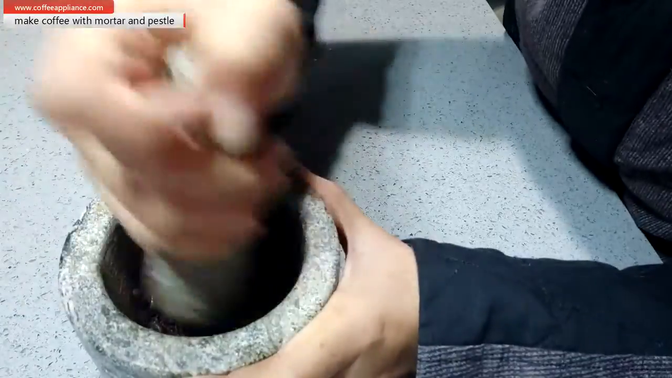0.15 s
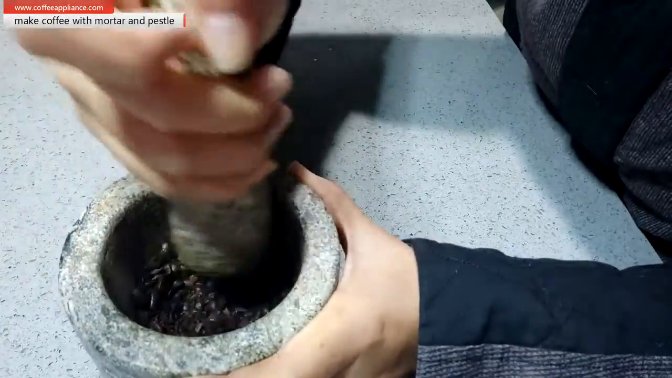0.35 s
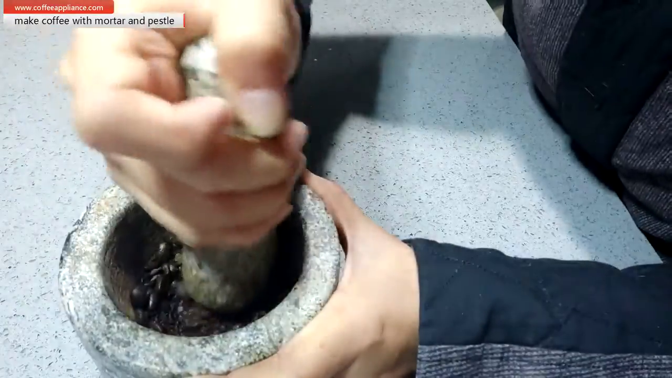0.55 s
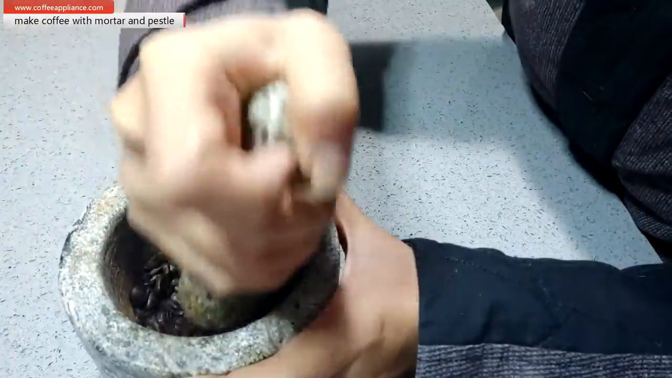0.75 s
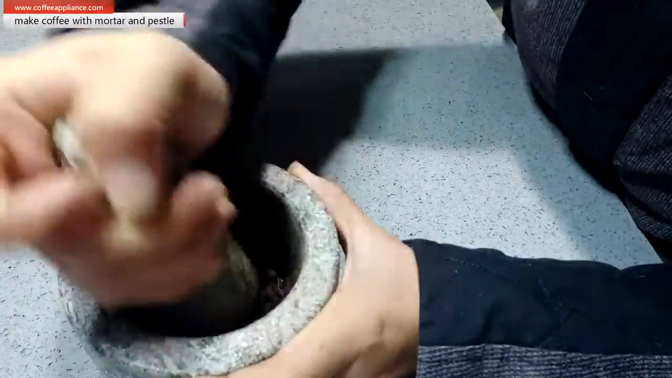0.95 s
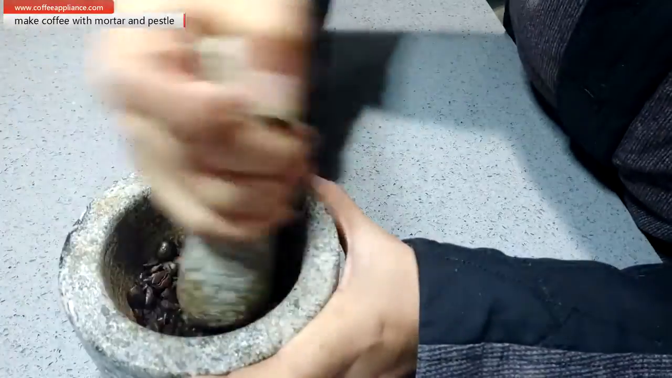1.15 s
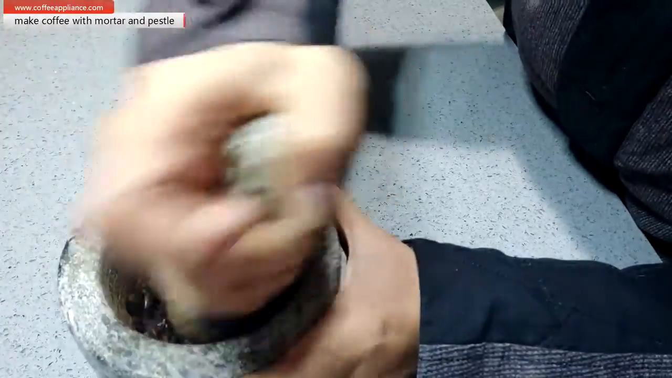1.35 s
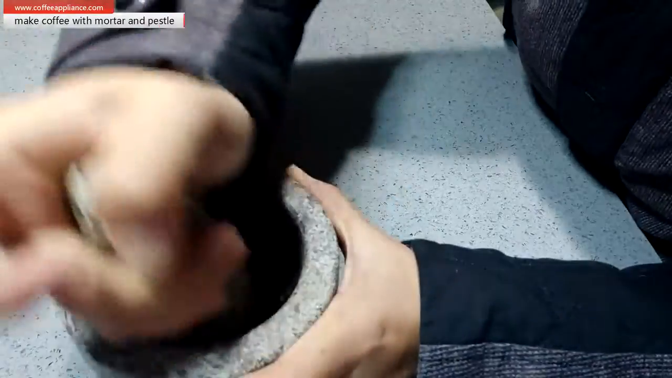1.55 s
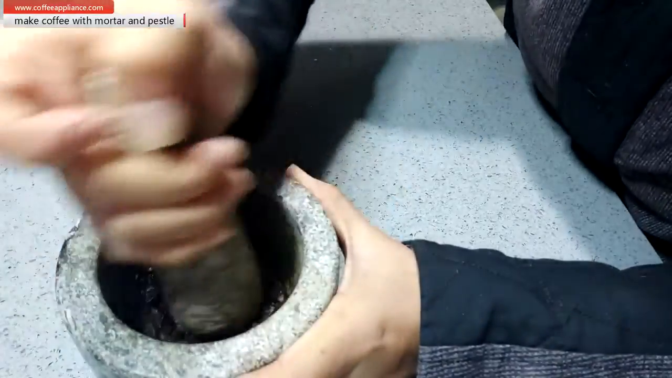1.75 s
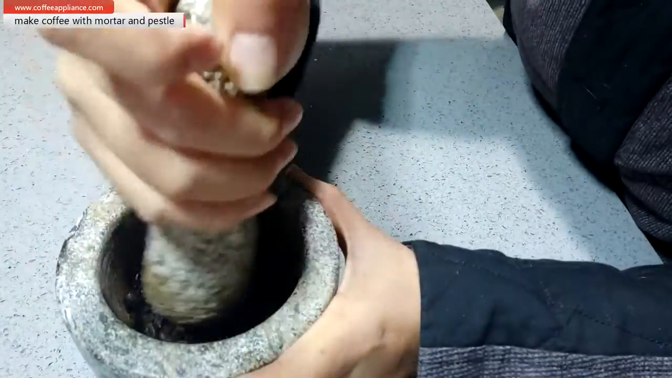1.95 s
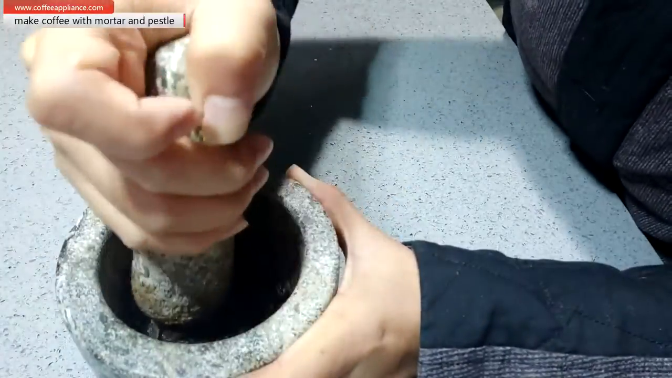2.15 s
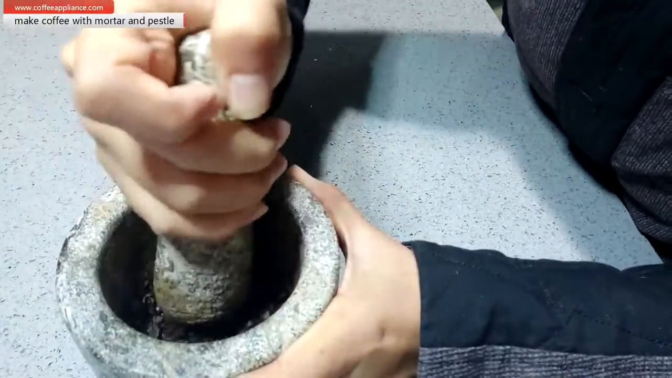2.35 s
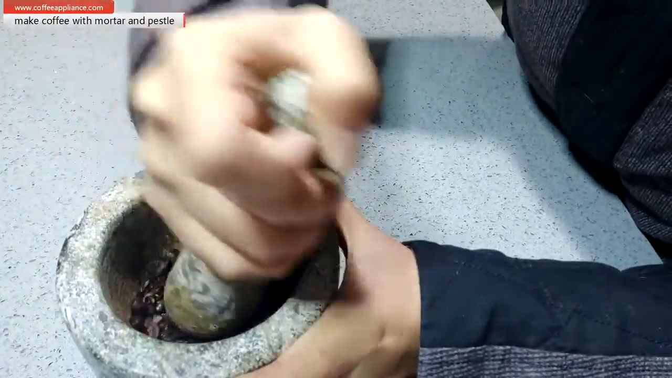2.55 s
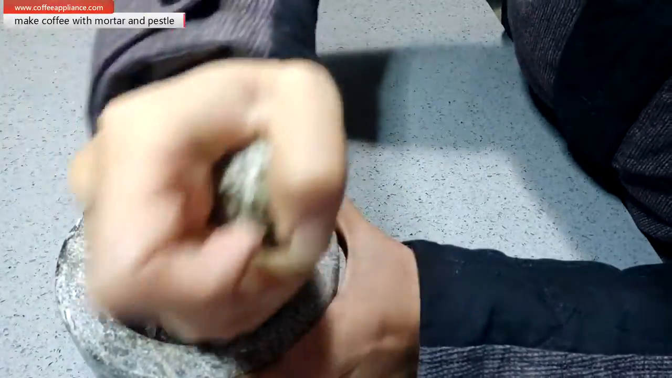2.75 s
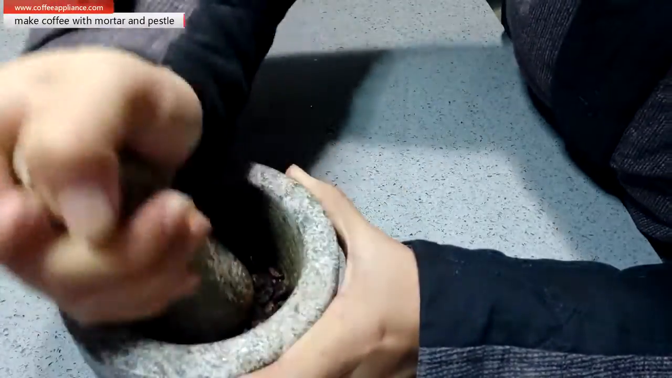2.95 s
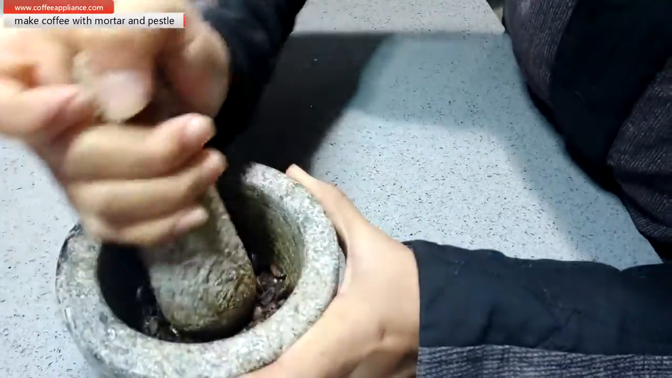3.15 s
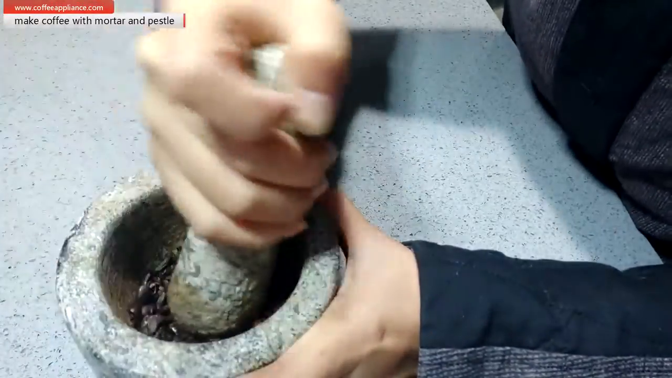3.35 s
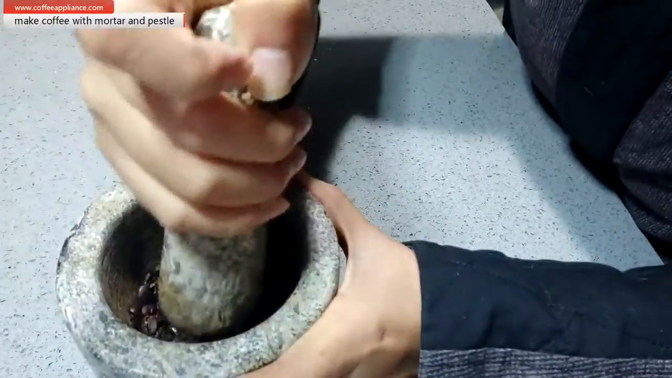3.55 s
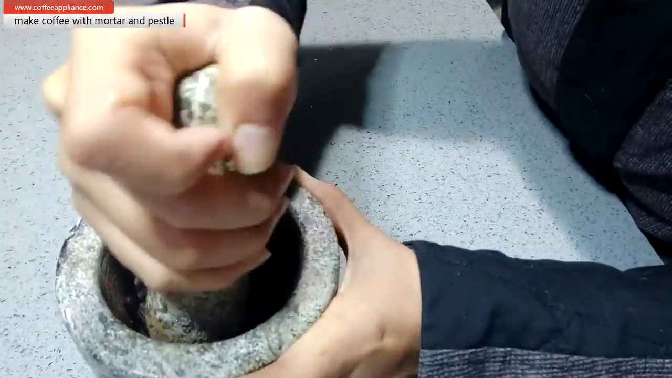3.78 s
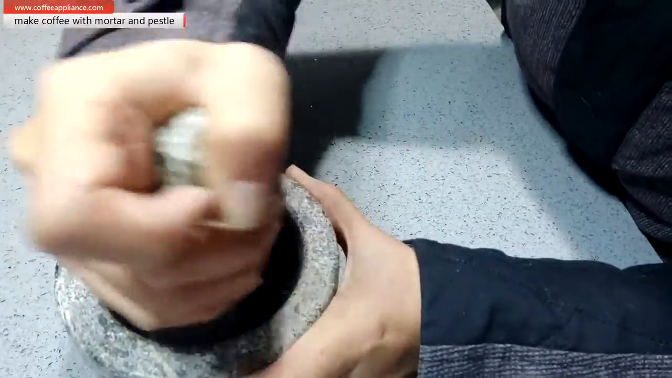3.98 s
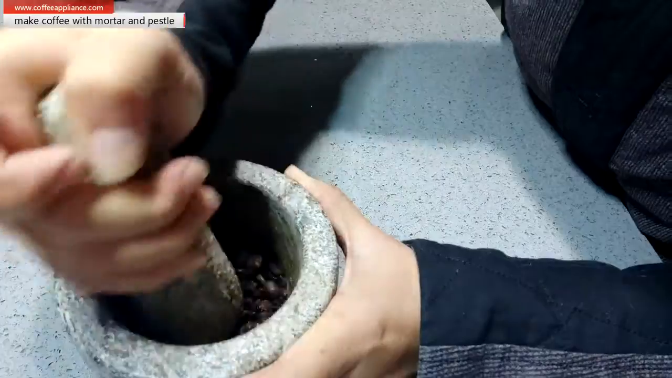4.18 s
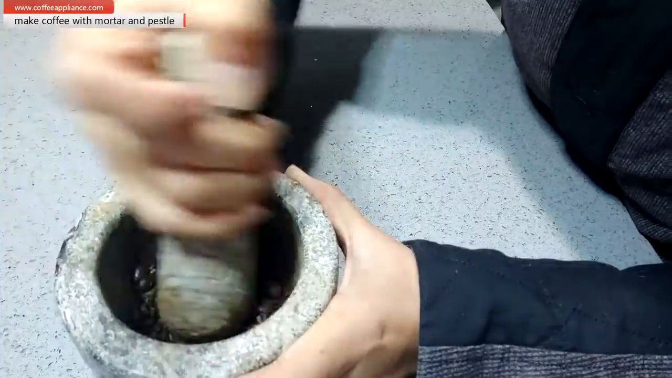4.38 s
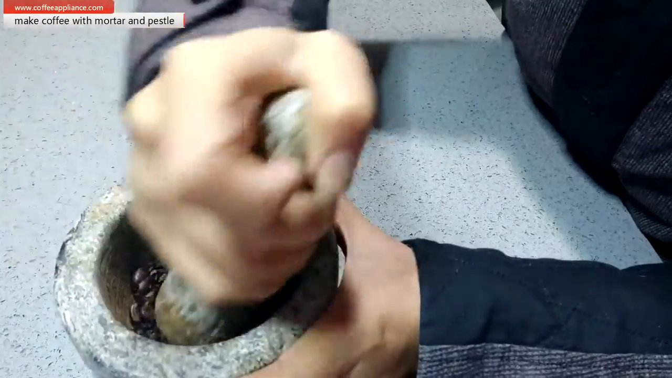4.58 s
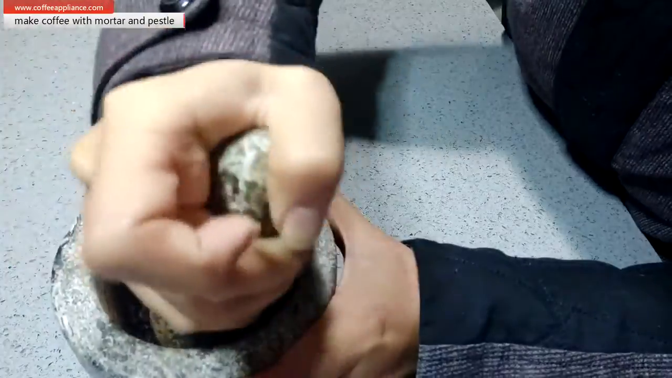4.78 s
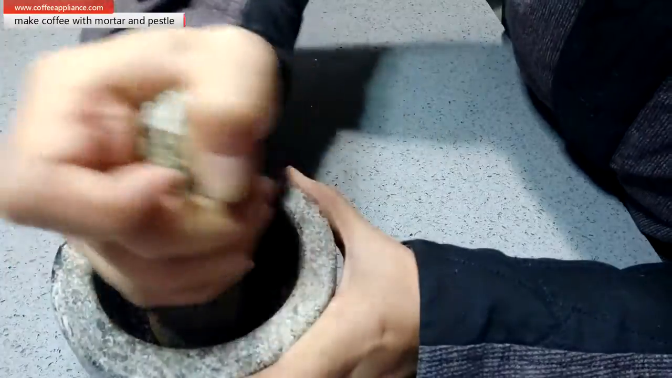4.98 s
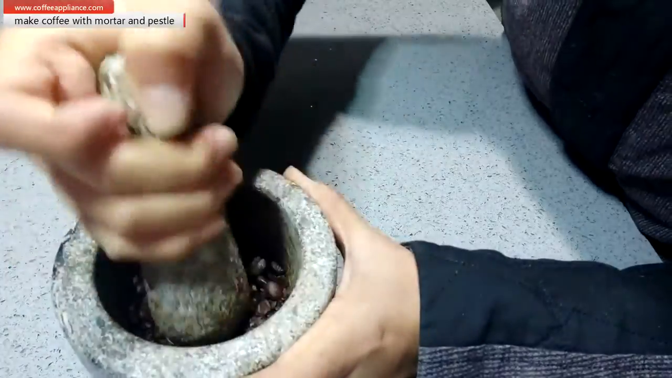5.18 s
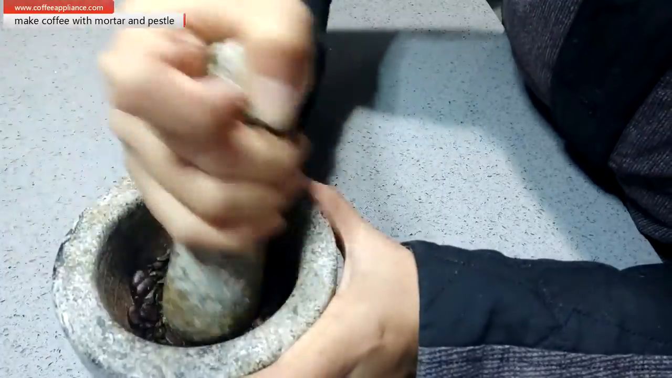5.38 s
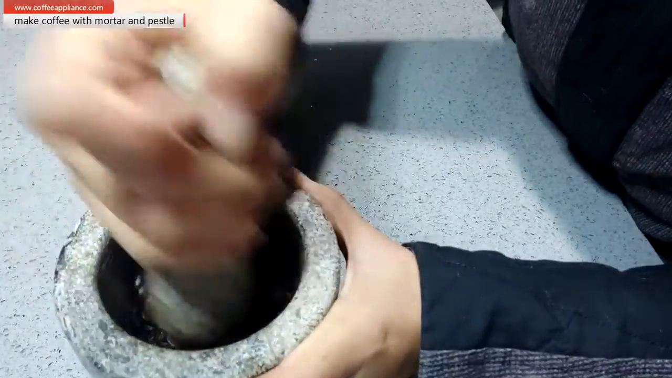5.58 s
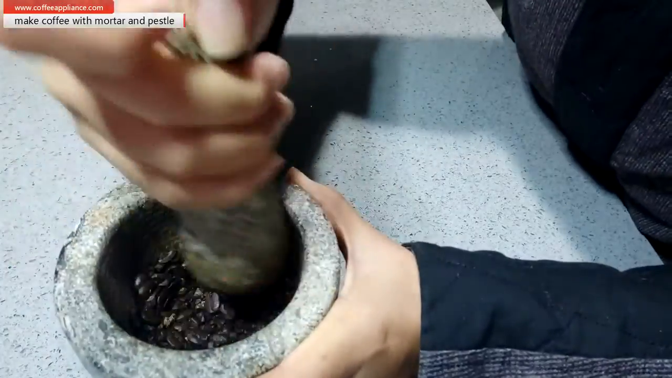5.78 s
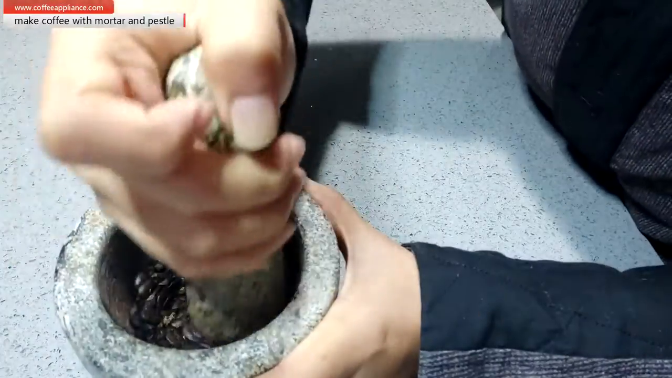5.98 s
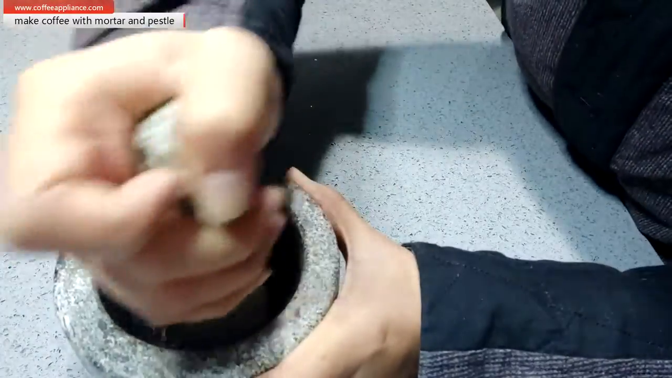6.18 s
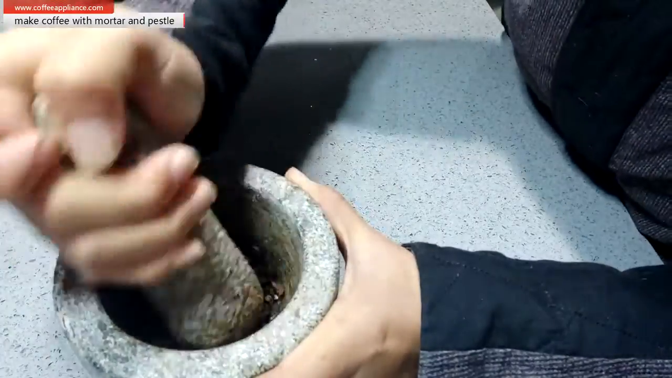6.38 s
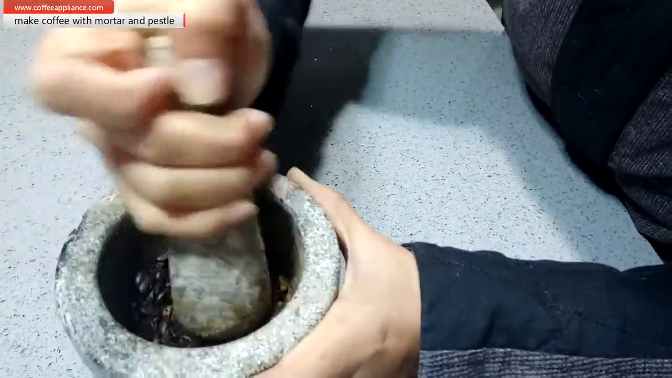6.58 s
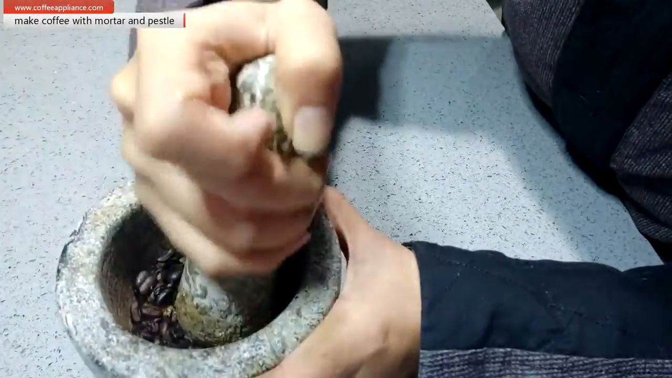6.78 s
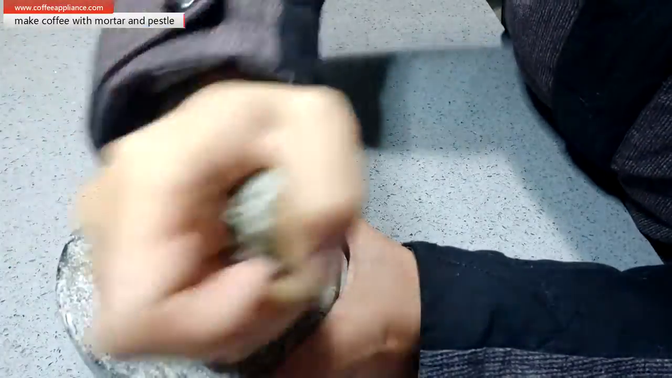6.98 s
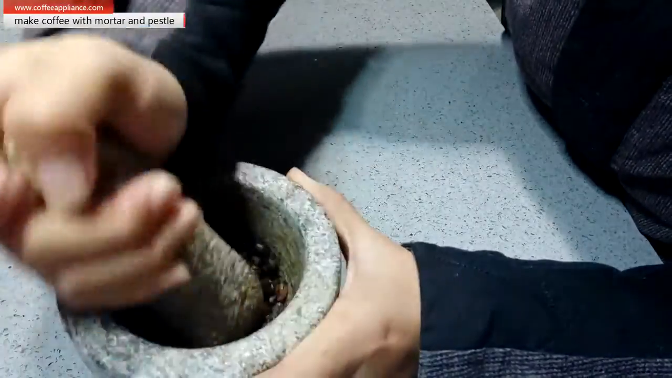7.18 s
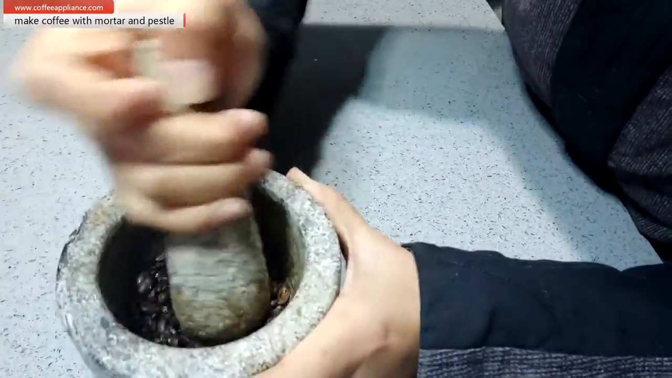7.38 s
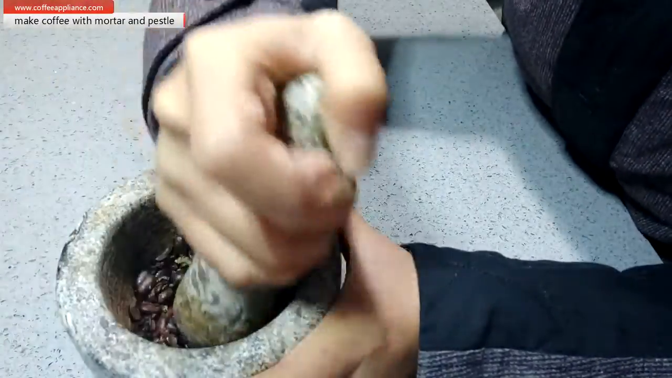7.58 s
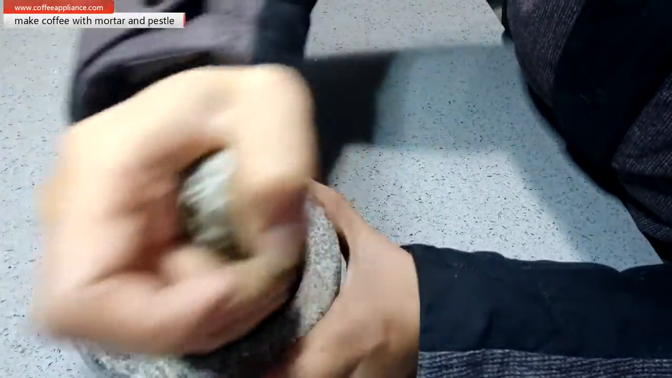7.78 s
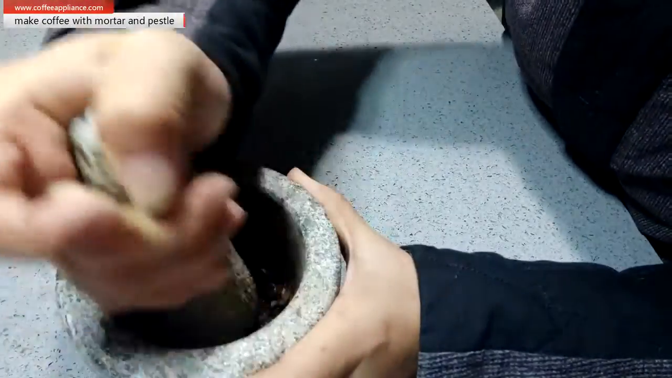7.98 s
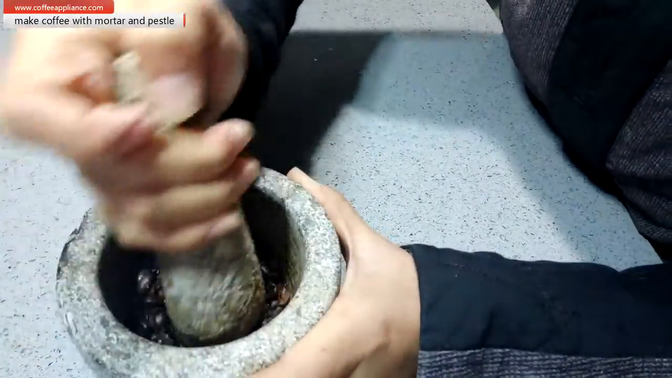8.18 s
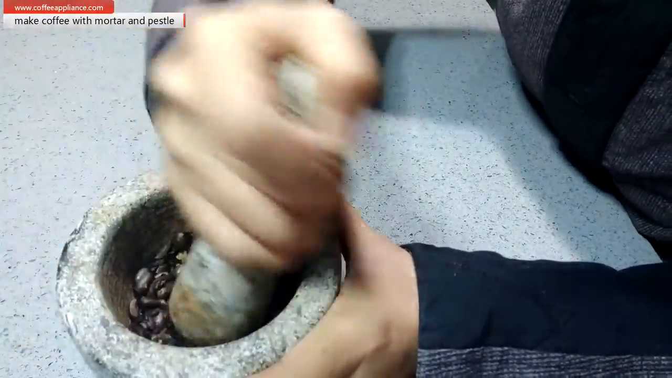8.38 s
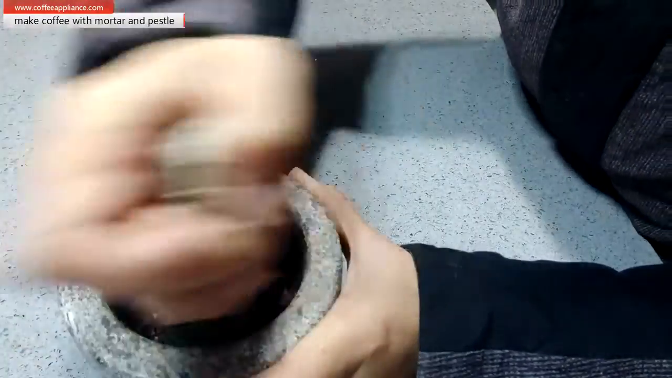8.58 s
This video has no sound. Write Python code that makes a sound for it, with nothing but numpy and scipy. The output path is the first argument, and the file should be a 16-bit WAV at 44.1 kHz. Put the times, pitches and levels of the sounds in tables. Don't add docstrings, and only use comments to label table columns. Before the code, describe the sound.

A stone pestle grinds hard roasted beans in a stone mortar, with sharp brittle cracks, gritty crunching, low thumps and occasional stone clinks.

```python
import sys
import numpy as np
from scipy import signal
from scipy.fft import rfft, irfft, next_fast_len
from scipy.io import wavfile
from scipy.ndimage import uniform_filter1d

SR = 44100
rng = np.random.default_rng(int(sys.argv[2]) if len(sys.argv) > 2 else 0)


def inscribe(sig):
    pcm = np.round(np.clip(np.atleast_2d(sig).T, -1, 1) * 32767)
    wavfile.write(sys.argv[1], SR, pcm.astype(np.int16))


def volts_from_decibels(level):
    exponent = np.asarray(level, float) / 20
    return 10 ** exponent


N = 380583
T = np.arange(N) / SR


def level(x, db):
    return x * volts_from_decibels(db) / np.sqrt(np.mean(x ** 2))


def conv(x, h):
    return signal.oaconvolve(np.atleast_2d(x), np.atleast_2d(h), axes=1)[:, :N]


def colour(points, size=1024):
    hz, db = np.transpose(points)
    bins_hz = np.linspace(1, SR / 2, size // 2 + 1)
    gain_db = np.interp(np.log(bins_hz), np.log(hz), db)
    cepstrum = irfft(np.log(volts_from_decibels(gain_db)))
    cepstrum[1:size // 2] *= 2
    cepstrum[size // 2 + 1:] = 0
    return irfft(np.exp(rfft(cepstrum)))


def ring(modes, right_db=0., turn=0.):
    t = np.arange(SR // 3) / SR
    response = np.zeros((2, len(t)))
    for hz, db, t60 in modes:
        size_odd, phase_odd = rng.standard_normal(2)
        port_db = db + np.array([[0], [right_db + 2.0 * size_odd]])
        phase = np.array([[0], [turn * hz / 1000 * (phase_odd - 1)]])
        decay = np.exp(-np.log(1000) * t / t60)
        response += volts_from_decibels(port_db) * decay * np.sin(2 * np.pi * hz * t + phase)
    return response / np.abs(response).max()


def train(s, size):
    at = np.clip((np.atleast_2d(s) * SR).astype(int), 0, N - 1)
    rows = zip(*np.broadcast_arrays(at, np.atleast_2d(size)))
    return np.array([np.bincount(i, z, N) for i, z in rows])


def tinted(s, size, repeat_s, depth):
    u = rng.uniform(-1.13, 1, (3, np.shape(size)[1]))
    gap = 1 / SR + repeat_s * (1 + u[0]) / 2
    first = train(s + gap, depth * size * u[1])
    second = train(s + 2 * gap, depth * size * u[2])
    return train(s, size) + first + second


def scatter(count, spread_db, shared, repeat_s):
    s, pick, sign = rng.random((3, 2, count))
    size_db = spread_db * np.minimum(rng.exponential(size=(2, count)), 5.6)
    size = volts_from_decibels(size_db) * np.sign(sign - .5)
    both = pick[0] < shared
    s[1] = np.where(both, s[0], s[1])
    size[1] = np.where(both, size[0], size[1])
    return tinted(s * N / SR, size, repeat_s, depth=0.54)


def walk(rate):
    hold = int(SR / rate)
    steps = rng.standard_normal(3000)[:N // hold + 1]
    return 1.2 * uniform_filter1d(np.repeat(steps, hold), hold)[:N]


def puff(hits, t60):
    power = signal.lfilter([1], [1, -np.exp(-2 * np.log(1000) / (t60 * SR))], hits ** 2)
    return np.sqrt(power) * rng.standard_normal((2, N))


# frequency in Hz, gain in dB.
ROOM_SPECTRUM = [
    (25, 0),
    (60, 5),
    (120, 7.5),
    (240, -5),
    (500, -5.5),
    (1000, -11.5),
    (2000, -17.5),
    (4000, -30),
    (8000, -34),
    (16000, -20),
]


def room():
    noise = conv(rng.standard_normal((3, N)), colour(ROOM_SPECTRUM, size=8192))
    low_pass = signal.butter(1, 500, fs=SR, output="sos")
    bass = signal.sosfilt(low_pass, noise[0] - .8 * noise[1:])
    return level(bass + noise[1:], -46)


# full pressure from in s, held in s, grit level in dB, weight on the mortar in dB.
PUSHES = [(0.038, 0.024, -25.5, -24.5), (0.189, 0.013, -35, -30.5), (0.598, 0.23, -24, -28),
          (0.938, 0.074, -22, -27.5), (1.07, 0.24, -19.5, -26), (1.448, 0.25, -30, -27.5),
          (1.7, 0.081, -31, -33.5), (1.88, 0.051, -36, -37), (2.206, 0.0093, -23.5, -39),
          (2.34, .11, -28.5, -32), (2.498, 0.35, -29.5, -30.5), (2.938, 0.11, -20, -24.5),
          (3.1, 0.16, -27, -33), (3.3, 0.15, -32.5, -42.5), (3.772, 0.078, -28.5, -34),
          (3.928, 0.061, -27, -27), (4.119, 0.47, -28, -28.5), (4.492, 0.13, -19, -23),
          (4.709, 0.063, -22, -23), (4.959, 0.0086, -30, -24.5), (5.052, 0.046, -26, -27.5),
          (5.168, .4, -27.5, -29), (5.975, 0.23, -32.5, -37.5), (6.38, 0.13, -37.5, -41),
          (6.247, 0.069, -24, -29), (6.533, 0.11, -25, -33), (6.7, 1.15, -28, -27), (7.95, 0.38, -39, -36),
          (8.132, 0.4, -32.5, -32), (8.45, 0.25, -29, -25)]


def pressure(db, fall_db_s):
    rise_db_s, sag_db_s, lifted_db = 534, 0.5, -80
    s, held = np.array(PUSHES).T[:2, :, None]
    t = T[::64]
    rise_db = rise_db_s * np.maximum(s - t, 0)
    sag_db = sag_db_s * np.clip(t - s, 0, held)
    fall_db = fall_db_s * np.maximum(t - s - held, 0)
    push_db = db[:, None] - rise_db - sag_db - fall_db
    return np.interp(T, t, np.maximum(push_db.max(axis=0), lifted_db))


def beans(breaks):
    s, *db = np.transpose(breaks)
    u = rng.random((len(s), 14, 6))
    delay = -.008 * np.log(1 - u[..., 0])
    delay[:, 0] = 0
    lag = .0001 * u[..., 1:3] - .0002
    fall_db = -11 - 500 * delay[..., None] - 14 * u[..., 3:5]
    fall_db[:, 0] = 0
    sign = np.sign(u[..., 5:] - .5)
    size = volts_from_decibels(np.transpose(db)[:, None] + fall_db) * sign
    when = s[:, None, None] + delay[..., None] + lag
    hits = tinted(when.reshape(-1, 2).T, size.reshape(-1, 2).T, repeat_s=0, depth=0.36)
    snaps = signal.lfilter([1, -.3], [1], hits)
    near = volts_from_decibels(-21.5) * puff(snaps, t60=0.0098)
    far = volts_from_decibels(-33.0) * puff(snaps, t60=0.23)
    return volts_from_decibels(3.0) * (snaps + near + far)


def loose(grit_db):
    u = rng.random((55, 3))
    s = u[:, :1] * T[-1]
    return np.hstack([s, np.interp(s, T, grit_db) + 24 - 12.5 * u[:, 1:]])


def grit(db, count, spread_db, shared, bunch_db):
    clicks = scatter(count, spread_db, shared, repeat_s=.00005)
    clicks = clicks + volts_from_decibels(-13.0) * puff(clicks, t60=0.023)
    s, size = rng.random((2, 700))
    starts = train(s * N / SR, volts_from_decibels(14 * size - 6))
    bunches = signal.lfilter([1], [1, -np.exp(-1 / (0.005 * SR))], starts)
    return level(clicks * (1 + bunches) * volts_from_decibels(bunch_db * walk(40)), db)


# resonance in Hz, sharpness Q, level in dB.
PORTS = [
    (6520, 3.75, -3),
    (9730, 7.7, -3.5),
]


def ports(x):
    size = next_fast_len(x.shape[1] + 256)
    hz = np.arange(size // 2 + 1) * SR / size
    h = np.array([volts_from_decibels(db) / (1 - (hz / f) ** 2 + 1j * hz / (f * q)) for f, q, db in PORTS])
    return irfft(rfft(x, size) * h, size)[:, :x.shape[1]]


# time in s, left peak in dB, right
# peak in dB.
CRACKS = [(0.0372, -9.5, -9), (0.8395, -9, -1), (1.0647, -8, -13), (1.1287, -4, 0), (1.2156, 5.5, -4),
          (1.5269, -1.5, 1), (1.792, -7, -5), (2.333, -2.5, -5), (2.6465, -2.5, -1), (2.7033, -0.5, 4.5),
          (2.9571, 1.5, -5), (3.142, 5, -1), (3.4249, -21, -6), (4.1809, -1, -4.5), (4.353, -1, -7),
          (4.493, -1, -12), (4.6984, -0.5, -0.5), (4.788, -23, -3), (4.9571, -5, -4), (5.0467, 0.5, 1),
          (5.2719, -2, -2), (5.3518, -2, 2.5), (6.5314, 0, 0.5), (6.7001, 5.5, 4.5), (6.769, 1, 2),
          (6.868, 1.5, 0), (6.927, 1, 4.5), (7.5169, -7, 0.5), (7.6397, -7, 0.5), (8.3868, -0.5, -2.5),
          (0.124, -13, -6), (0.626, -5, -22), (0.7703, -23, -28), (0.94, -40, -8), (1.456, -19, 0.5),
         (1.6914, -7.5, -14), (2.4267, -5.5, -0.5), (2.6132, -9, 2.5), (3.0998, -7.5, -8),
         (3.2208, -5.5, -3.5), (3.2981, -10, -9), (3.7565, -24, -10), (3.949, -4.5, -7),
         (4.065, -20, -10.5), (4.133, -12, -8), (4.2532, -6, -12), (4.309, -14, -51), (5.1726, -6, -24),
         (5.24, -20, -6), (5.3096, -8, -10), (5.4302, -8, -2.5), (5.979, -27, -1.5), (6.0946, -17, -8.5),
         (7.0625, 0, -3), (7.2342, -5, -5), (7.3294, -5, -2), (7.7233, -10.5, -3), (7.81, -1.5, -0.5),
         (8.1487, -4.5, -2), (8.5102, -5.5, 1),
          (0.05, -28, -8), (7.3197, -4, -7), (1.116, -24, -11), (1.5775, -10.5, -3), (1.6713, -8.5, -9.5),
          (7.7345, -9, -6), (2.5863, -6, -6), (2.749, -26, -2), (2.831, -26, -23), (7.366, -7, -6),
          (6.191, -14, -13), (3.498, -36, -10), (3.842, -17, -17), (4.386, 3, 1), (4.405, 0.5, 3),
          (4.618, -6, -5), (4.719, -1.5, 0), (4.831, -13, -5), (5.4692, -9, -2), (5.565, -12, -21),
          (6.3054, -18, -14), (6.6152, -17, -7), (6.633, -22, -8.5), (6.887, -4, 2), (6.9828, -4, -14),
          (7.1467, -26, -18), (7.2916, -6, -6), (7.3555, 5, -11), (6.157, -17, -6), (7.5587, -7, -2)]
# frequency in Hz, gain in dB.
SPLINTER = [
    (1500, -17.5),
    (3000, -2.5),
    (4500, 0),
    (6300, -1),
    (9000, -1.5),
    (12000, 4.5),
    (16000, 12),
]
# frequency in Hz, gain in dB.
HUSK = [
    (700, 17),
    (1500, 6.5),
    (2500, 6),
    (3500, 13),
    (5000, 0),
    (9000, -2.5),
]


def crunch(fine_db, coarse_db):
    snap, husk = colour(SPLINTER), colour(HUSK)
    cracks = beans(np.vstack([CRACKS, loose(fine_db)]))
    heard = ports(np.array([snap, snap]))
    fine = grit(fine_db - .5, count=17000, spread_db=2.5, shared=0.31, bunch_db=3.0)
    fine = fine / np.sqrt(np.sum(heard ** 2) / 2)
    coarse = grit(coarse_db + .5, count=6000, spread_db=1.5, shared=0.61, bunch_db=2.5)
    coarse = coarse / np.sqrt(np.sum(husk ** 2))
    bright = conv(cracks / np.abs(heard).max(axis=1, keepdims=True) + fine, snap)
    dull_cracks = volts_from_decibels(-13) * cracks.mean(axis=0) / np.abs(husk).max()
    return bright + conv(dull_cracks + coarse, husk)


def drag(db, count, spread_db, shared, repeat_s):
    return level(scatter(count, spread_db, shared, repeat_s), db + 2.03 * walk(30))


# time in s, peak in dB, level of the upper modes in dB.
JOLTS = [(0.502, -13, -45), (0.768, -9.5, -44), (1.062, -12, -26.5), (1.343, -9.5, -31),
         (1.563, -13.5, -23), (2.207, -20, -47), (2.333, -14.5, -39), (2.644, -17.5, -28),
         (2.915, -18, -31), (3.015, -13.5, -53), (3.927, -14.5, -33), (4.134, -12.5, -52),
         (4.308, -14.5, -38), (4.498, -34, -30), (4.543, -2, -32), (4.707, -14, -20), (4.958, -10.5, -44),
         (5.049, -13, -25), (5.095, -34, -32.5), (5.925, -13.5, -31), (6.262, -16.5, -20),
         (6.536, -11, -34), (6.815, -10, -25), (6.927, -11, -32), (7.102, -17, -29), (7.17, -12, -36),
         (7.259, -29, -17.5), (7.636, -19, -28), (7.721, -21, -33), (8.533, -5.5, -21)]
# frequency in Hz, level in dB, t60 in s.
SEAT = [
    (42, -19.5, 1),
    (69, -18.5, 0.3),
    (89.6, -13, 0.68),
    (127, -11, 0.095),
    (180.5, -18.5, 0.95),
    (238.8, 5.5, 0.18),
    (273, -17, 0.55),
    (281.5, -9.5, 0.1),
]
# frequency in Hz, level in dB, t60 in s.
TOP = [
    (435, -3, 0.085),
    (509, -5.5, 0.046),
    (610, -7, 0.027),
    (647, -4.5, 0.12),
    (815, -4, 0.039),
    (949.7, 0, 0.056),
    (1073, -2.5, 0.02),
    (1373, -13, 0.072),
    (1756, -25.5, 0.2),
]


def mortar(seat_db, scrape_db):
    seat = ring(SEAT, right_db=-1.5, turn=1.0)
    top = ring(TOP, right_db=-2.3, turn=0.92)
    s, db, top_db = np.transpose(JOLTS)
    low = drag(seat_db + 1.0, count=1500, spread_db=2.5, shared=1.0, repeat_s=0.0012)
    low = low / np.sqrt(np.sum(seat ** 2) / 2)
    high = drag(scrape_db + 4.0, count=4000, spread_db=2.0, shared=.7, repeat_s=0.001425)
    high = high / np.sqrt(np.sum(top ** 2) / 2)
    high += tinted(s[None], volts_from_decibels(top_db[None] + 9.5), repeat_s=0.00142, depth=1.0)
    return conv(low + train(s, volts_from_decibels(db - 1.5)), seat) + conv(high, top)


# time in s, peak in dB, contact in ms.
KNOCKS = [(0.4982, -7.5, 0.21), (1.092, -13.5, 0.63), (1.356, -3.5, 0.73), (2.204, -40, 0.27),
          (2.646, -14.5, 0.95), (3.753, -62, .3), (5.048, -16, 0.85), (5.9253, -9.5, 0.33),
          (6.205, -13.5, 0.98), (6.258, -17, 0.48), (7.263, -16, 0.37), (8.149, -13, 0.61),
          (8.5348, 3.5, 0.7), (8.554, -2, 0.63)]
# frequency in Hz, level in dB, t60 in s.
STONE = [
    (1860, -7, 0.0076),
    (2690, 21, 0.0076),
    (6060, -14, .008),
]
# frequency in Hz, gain in dB.
THUD = [
    (100, -17.5),
    (300, 10.5),
    (700, 8),
    (1100, 4.5),
    (1800, 0),
    (3000, -8),
    (5000, -16),
    (16000, -79),
]


def knocks():
    click, tail = np.zeros((1, N)), np.zeros((2, N))
    fade_s = np.arange(5000) / SR
    decay = np.exp(-np.log(1000) * fade_s / 0.19)
    for s, db, contact_ms in KNOCKS:
        force = signal.windows.hann(64) ** np.clip((1.45 / contact_ms) ** 2, 1, 300)
        force *= volts_from_decibels(db) / force.sum()
        i = int(s * SR)
        click[0, i:i + len(force)] = force
        noise = rng.standard_normal((3, len(fade_s)))
        thud = conv((noise[0] + noise[1:]) * decay, force)[:, :N - i]
        tail[:, i:i + thud.shape[1]] += thud
    body = colour(THUD)
    rings = volts_from_decibels(4.0) * conv(click, ring(STONE, right_db=0.0, turn=0.32))
    return rings + conv(volts_from_decibels(-17) * click + volts_from_decibels(-23.5) * tail, body / np.abs(body).max())


def scene():
    _, _, push_grit_db, push_weight_db = np.transpose(PUSHES)
    grit_db = pressure(push_grit_db, fall_db_s=202)
    seat_db = pressure(push_weight_db, fall_db_s=156)
    coarse_db = -45 + 0.47 * (grit_db + 29)
    scrape_db = -11.5 + seat_db + 0.1 * (grit_db - seat_db)
    return room() + crunch(grit_db, coarse_db) + mortar(seat_db, scrape_db) + knocks()


def top_cut(x):
    return signal.sosfilt(signal.butter(12, 16960, fs=SR, output="sos"), x)


def record(dry):
    x = ports(dry)
    x = x / (1 + (x / .74) ** 4) ** .25
    top = signal.ellip(6, .3, 24, 15800, fs=SR, output="sos")
    bass = signal.butter(2, 42, "high", fs=SR, output="sos")
    mix = signal.sosfilt(np.vstack([top, bass]), x)
    return top_cut(mix)


dry = scene()
out = record(dry)
inscribe(out)
```